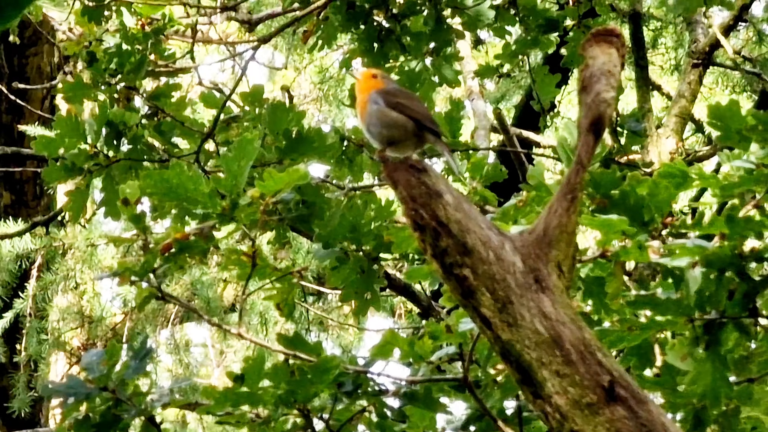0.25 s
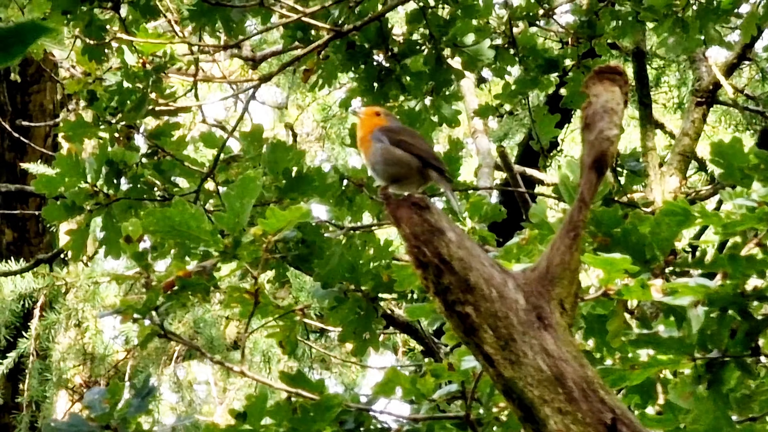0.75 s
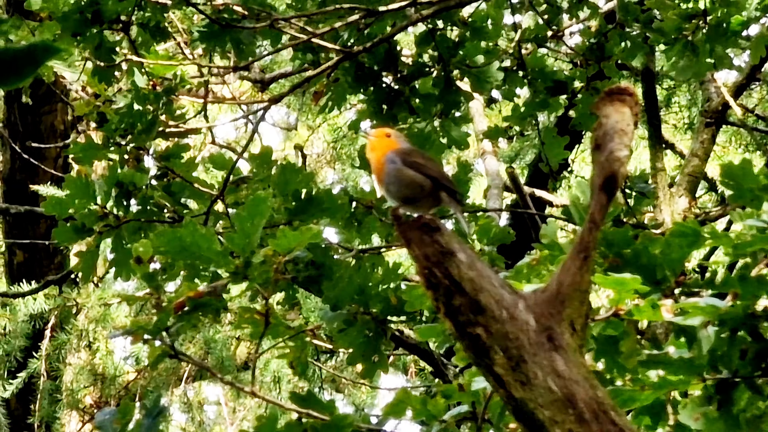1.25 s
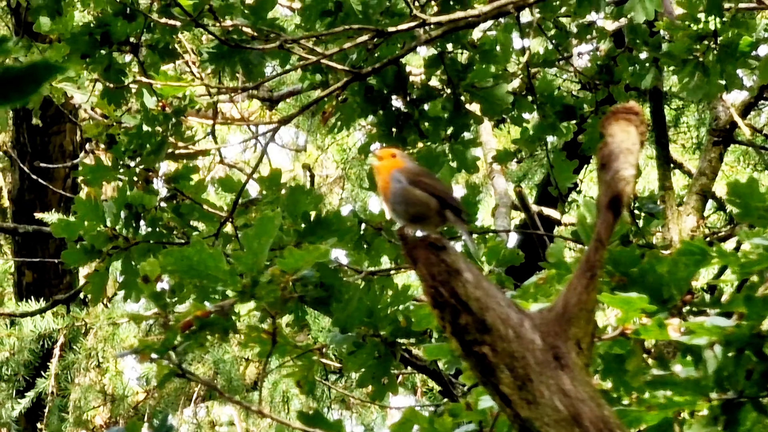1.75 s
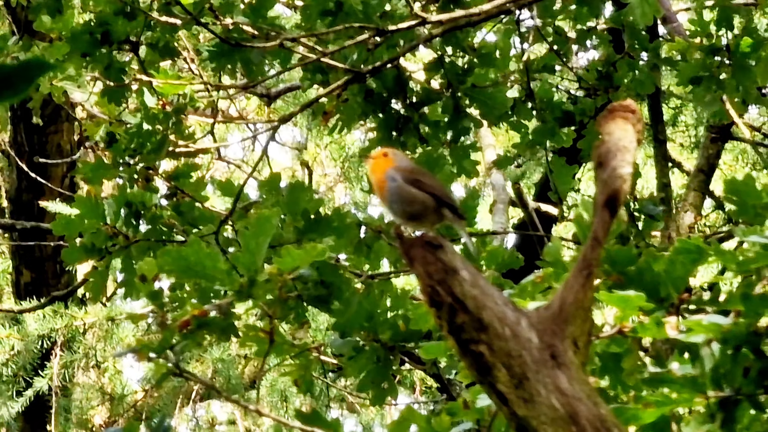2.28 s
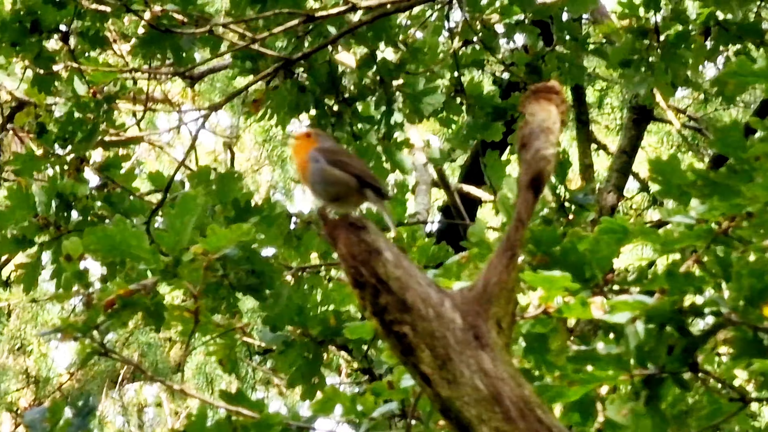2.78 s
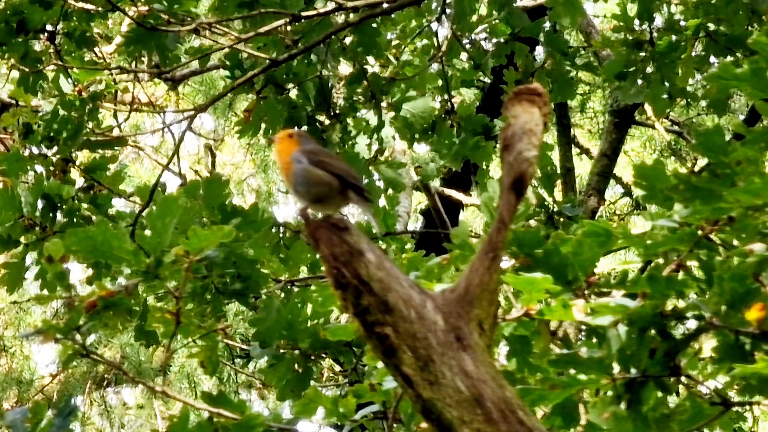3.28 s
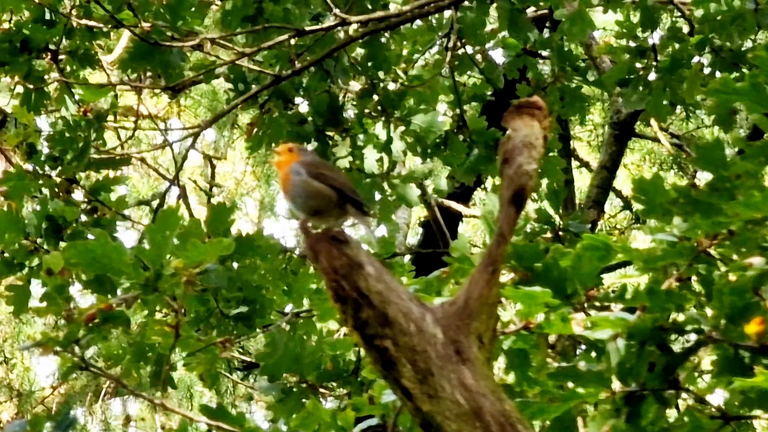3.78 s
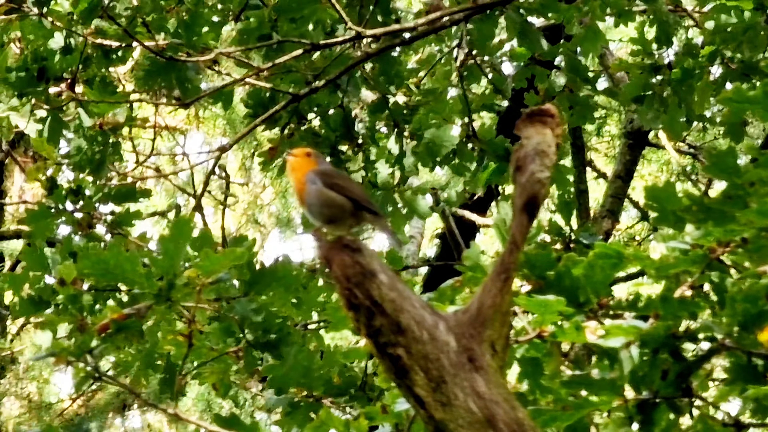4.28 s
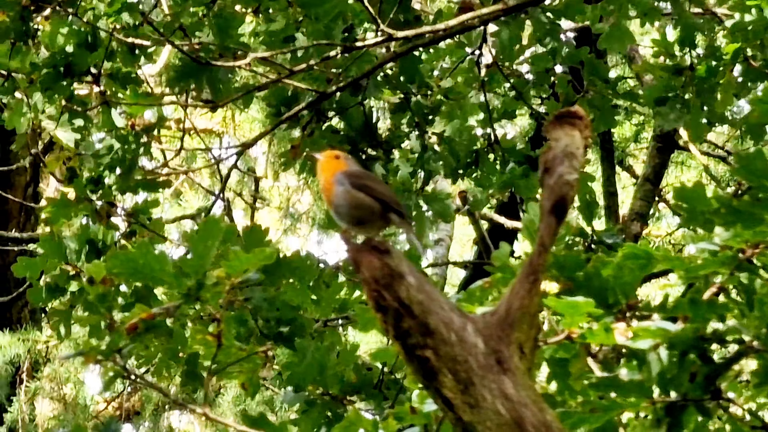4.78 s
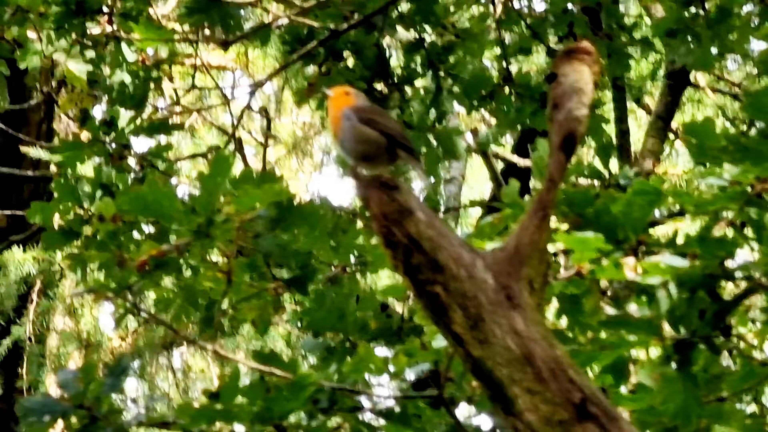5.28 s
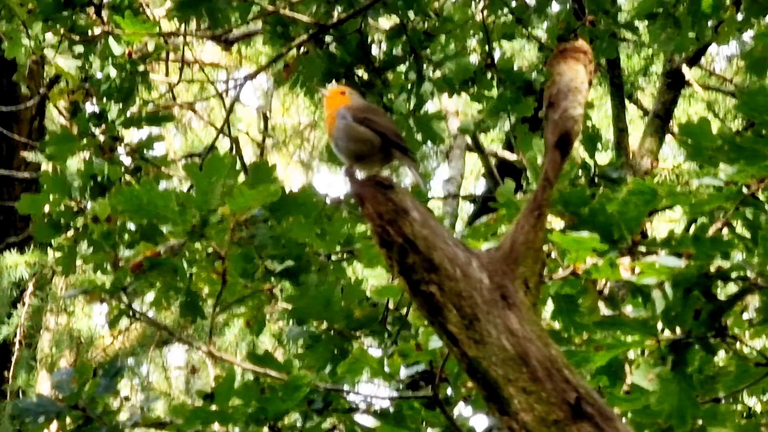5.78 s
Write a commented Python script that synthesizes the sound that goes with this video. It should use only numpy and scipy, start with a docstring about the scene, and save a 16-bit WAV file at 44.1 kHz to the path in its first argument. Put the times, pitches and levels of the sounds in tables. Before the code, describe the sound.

Outdoors in a leafy wood, a small robin sings quick phrases of clear, thin whistles, gliding, sinking low, then rising to a thin squeaky trill and a fast sparkling chatter. The song stops before five seconds. Sparse echoes scatter off trunks. Under it lie low distant traffic rumble, faint leaf hiss and very faint other birds. Small dry ticks come from the hand-held camera.

```python
"""A robin sings five quick warbling phrases from a branch in a leafy wood, mostly a little to the right.
Its syrinx is a gliding, near-pure whistle with weak overtones, swelled by breath and sometimes throbbing.
Trunks and leaves scatter each note into a tail of sparse echoes; faint blurred whistles are other birds.
The body of a hand-held camera ticks as ringing short modes; shaped noise makes far traffic rumble and leaf hiss.
"""
import sys
import numpy as np
from scipy import signal
from scipy.io import wavfile
from scipy.ndimage import uniform_filter1d

SR = 44100
rng = np.random.default_rng(int(sys.argv[2]) if len(sys.argv) > 2 else 0)


def voltage_ratio(level):
    """Linear amplitude factor for a level in decibels (scalar or array-like)."""
    return 10 ** (np.asarray(level, float) / 20)


def wrap_up_sound(samples):
    """Save the sound to the file named by the first command line argument, as 16-bit audio."""
    columns = np.atleast_2d(samples).T
    # keep every value between -1 and 1, then stretch to whole-number steps
    tamed = np.clip(columns, -1, 1)
    steps = np.round(tamed * 32767).astype(np.int16)
    wavfile.write(sys.argv[1], SR, steps)


N = 266364


def evened(x):
    """Scales to rms 1."""
    return x / np.sqrt(np.mean(x ** 2) + 1e-20)


def read(points, hz):
    """Reads a table on a log-frequency axis."""
    f, value = np.transpose(points)
    return np.interp(np.log(hz + 1), np.log(f + 1), value)


def add(mix, start_s, sound):
    """Mixes a sound in at its start time."""
    part = mix[..., round(start_s * SR):][..., :sound.shape[-1]]
    part += sound[..., :part.shape[-1]]


def wobble(count, size):
    """Smooth random drift of about rms 1; a larger size (samples) drifts more slowly."""
    noise = rng.standard_normal(count + size)
    smooth = uniform_filter1d(uniform_filter1d(noise, size), size)
    return evened(smooth)[:count]


def fade_inside(t, start, end, ramp_s):
    """Straight ramps up from start and down to end, 0 outside."""
    return np.clip(np.minimum(t - start, end - t) / ramp_s, 0, 1)


def chip(start, length, level_db, from_hz, to_hz):
    """One puff of breath: a single glide under one arch of level."""
    crest = 0.45  # share of the length at which the note is loudest
    arch_db, bend = -9, 1.1  # level at either end against the crest; power that bends the glide
    u = np.arange(0, length, 1 / SR) / length
    away = np.where(u < crest, 1 - u / crest, (u - crest) / (1 - crest))
    hz = from_hz + (to_hz - from_hz) * u ** bend
    return start + u * length, hz, level_db + arch_db * away ** 2


def unroll(path):
    """Draws a pitch path sample by sample, corners rounded as muscles move."""
    s, hz = np.transpose(path)
    t = np.arange(s[0], s[-1], 1 / SR)
    return t, uniform_filter1d(np.interp(t, s, hz), size=90)


# how readily the syrinx sounds at each pitch: (pitch [Hz], gain [dB])
SYRINX_YIELD = [(2100, -18), (2700, -14.5), (3300, -5.5), (4000, -2.5), (4800, 2), (5800, 0.5), (6800, 1.5),
                (7600, -7), (8600, -19)]


def whistle(path, effort_db, start_db, end_db):
    """Breath builds and ebbs; the syrinx sounds strongest in the middle of its range."""
    build, ebb = 3.0, 3.13  # powers that shape the start and the end
    t, hz = unroll(path)
    u = (t - t[0]) / (t[-1] - t[0])
    breath_db = effort_db + start_db * (1 - u) ** build + end_db * u ** ebb
    return t, hz, breath_db + read(SYRINX_YIELD, hz)


def snap(length, hz):
    """A click a few cycles long, spread wide and centred above the pitch."""
    t = (np.arange(length) - 60) / SR
    return np.exp(-(t * hz / 1.7) ** 2) * np.cos(2 * np.pi * 1.27 * hz * t)


# overtones of the whistle, before their colour: (multiple of the pitch [ratio], level [dB])
OVERTONES = [(2, -35.5), (3, -50), (4, -53.5), (5, -50)]
# colour that the overtones take on: (frequency [Hz], gain [dB])
OVERTONE_COLOUR = [(4000, -2.5), (5800, -8.5), (6600, 7.5), (8000, -20), (9500, -3), (10500, -7),
                   (11700, -5), (13000, -9), (15000, 8.5), (16000, 5.5)]
# level of the bird, left against right: (pitch [Hz], difference [dB])
BIRD_LEFT_LEVEL = [(2000, 3.5), (3500, -5.5), (5000, -5), (8000, -1)]
# phase by which the left leads the right: (pitch [Hz], lead [rad])
BIRD_LEFT_LEAD = [(2000, 2.27), (2760, 1.07), (4570, 0.09), (5600, 1.55), (7150, 1.93)]
# held notes that throb: (start [s], end [s], throb rate [Hz], depth [0-1], pitch swing [Hz])
PURRS = [(1.45, 1.6, 220, 0.85, 20), (3.6, 3.99, 300, 0.55, 110), (4.05, 4.1, 130, .2, 140),
         (4.676, 4.72, 95, 0.5, 110), (4.71, 4.8, 95, .4, 25)]
# soft low notes briefly gain an upper partial: (start [s], end [s], multiple of the pitch [ratio], level [dB])
LOW_PARTIALS = [(2.55, 2.685, 1.5, -3), (2.665, 2.785, 2, -8), (2.71, 2.75, 1.5, -3), (3.29, 3.36, 2, -10),
                (3.36, 3.425, 1.5, -1)]


def robin_note(t, hz, level_db):
    """A near-pure whistle with weak overtones; left and right differ in level and phase."""
    count = len(t)
    size = np.sqrt(2) * voltage_ratio(level_db + 1.2 * wobble(count, size=120))
    sung_hz = hz.copy()
    for start, end, throb_hz, depth, swing_hz in PURRS:
        # quicker throbs are more ragged
        turn = 2 * np.pi * throb_hz * t + throb_hz / 220 * wobble(count, size=300)
        inside = fade_inside(t, start, end, 0.011)
        sung_hz += swing_hz * np.cos(turn) * inside
        size *= 1 + depth * np.sin(turn) * inside
    cycles = np.cumsum(sung_hz * (1 + 0.0047 * wobble(count, size=60))) / SR
    angle = 2 * np.pi * (cycles + rng.random())
    angles = np.array([angle + read(BIRD_LEFT_LEAD, sung_hz), angle])
    tone = np.sin(angles)
    for k, db in OVERTONES:  # overtones are breathy: their phase wanders
        gain = voltage_ratio(db + read(OVERTONE_COLOUR, k * sung_hz)) * (k * sung_hz < 17000)
        tone += gain * np.sin((k - 1) * angle + angles + wobble(count, size=50))
    for start, end, k, db in LOW_PARTIALS:
        tone += voltage_ratio(db) * fade_inside(t, start, end, 0.012) * np.sin(k * angles)
    edge = fade_inside(t, t[0], t[-1], 0.003)
    tone *= np.sin(edge * np.pi / 2) ** 2
    if t[-1] - t[0] < 0.03:  # the syrinx snaps open and shut on quick notes
        tone += voltage_ratio(-18) * (snap(count, sung_hz[0]) + snap(count, sung_hz[-1])[::-1])
    return t[0], size * tone * voltage_ratio(np.outer([.5, -.5], read(BIRD_LEFT_LEVEL, sung_hz)))


# short notes, one glide each: (start [s], length [s], crest level [dB rms], from pitch [Hz], to pitch [Hz])
CHIPS = [ (0.714, 0.024, -55, 3460, 3600), (.74, 0.03, -42.5, 3840, 4030), (0.757, 0.0072, -38, 4000, 4140),
         (0.766, 0.011, -40.5, 3930, 4100), (0.776, 0.02, -35, 3710, 4320),
         (0.975, 0.017, -35.5, 3540, 5620), (1.175, 0.026, -28, 3770, 3740), (1.21, 0.013, -52, 3600, 3780),
         (1.251, 0.015, -32.5, 3870, 4070), (1.256, 0.0083, -33.5, 3830, 5260),
         (1.375, .023, -32, 3790, 3633), (1.426, 0.017, -41.5, 3600, 3550),
         (2.846, .014, -56.5, 4600, 4200), (2.86, 0.016, -45.5, 3940, 3740),
         (3.551, 0.029, -39.5, 6560, 7580), (3.64, 0.045, -31, 6920, 7230), (3.701, 0.049, -32, 7080, 7130),
         (3.748, .068, -28, 7080, 7240), (3.734, .065, -36, 7700, 7650), (3.801, 0.033, -32, 7820, 7250),
         (3.84, 0.033, -36.5, 7430, 7400), (3.927, 0.053, -42, 7600, 7780),
         (4.16, 0.017, -19.5, 3760, 3420), (4.194, .016, -24, 4680, 4150), (4.216, .016, -19.5, 4070, 4290),
         (4.23, 0.013, -28, 4900, 4500), (4.254, 0.0094, -21, 4570, 4780), (4.261, .011, -23, 4840, 4400),
         (4.277, 0.018, -21, 4174, 4990), (4.29, .014, -29, 4970, 3490), (4.313, 0.018, -23, 4365, 4280),
         (4.339, 0.019, -23.5, 3850, 4100), (4.358, 0.041, -32, 4080, 4370), (4.397, .012, -26, 3870, 5170),
         (4.413, 0.028, -37.5, 4610, 4000), (4.437, 0.015, -29.5, 4250, 3820),
         (4.457, 0.013, -25, 3690, 3760), (4.475, .012, -38.5, 3970, 3940), (4.542, .01, -21.5, 4150, 3550),
         (4.551, 0.012, -28.5, 3685, 4290), (4.583, 0.018, -24, 3775, 4060),
         (4.603, 0.011, -23, 3600, 2990), (4.614, .013, -25, 3440, 3240), (4.634, 0.023, -27, 3214, 2950),
         (4.652, 0.015, -25, 3200, 3860), (4.667, 0.015, -26.5, 3043, 3205), ]
# long whistles, one pitch path each: (time [s], pitch [Hz])
WHISTLES = [
    [(.875, 3750), (.884, 3780), (.888, 3270), (.893, 3460), (.899, 3070), (.912, 3350)],
    [(.99, 3920), (.996, 3770), (1.0, 4100), (1.005, 3433), (1.03, 3266), (1.045, 3390)],
    [(1.09, 3540), (1.11, 4204), (1.124, 3737), (1.163, 3723)],
    [(1.262, 3600), (1.28, 3590), (1.295, 3403), (1.315, 3440), (1.335, 3740)],
    [(1.46, 3585), (1.472, 3610), (1.59, 3631)],
    [(1.735, 6000), (1.743, 5140), (1.757, 5800), (1.764, 7540), (1.769, 6450), (1.775, 7900),
     (1.783, 5400), (1.793, 6800), (1.799, 5870), (1.82, 6200), (1.838, 4740), (1.85, 4690)],
    [(1.797, 7630), (1.825, 8680), (1.838, 6680), (1.854, 7250), (1.861, 6680), (1.88, 6850), (1.895, 5500),
     (1.91, 4710), (1.93, 4720), (1.941, 5000), (1.956, 2730), (1.971, 2710)],
    [(2.118, 8600), (2.13, 7700), (2.158, 7310), (2.188, 5550), (2.205, 6080), (2.23, 5576), (2.237, 5790),
     (2.246, 4630), (2.262, 4733), (2.284, 4784), (2.3, 2360)],
    [(2.392, 5700), (2.401, 4030), (2.411, 4167), (2.42, 3080), (2.443, 2780), (2.472, 2705)],
    [(2.5, 2322), (2.64, 2194), (2.79, 2124)],
    [(2.876, 3980), (2.922, 4464), (2.937, 5180), (2.954, 5440), (2.972, 5290), (2.982, 4650), (2.99, 3850),
     (3.004, 3060), (3.014, 2880), (3.025, 3040), (3.04, 2745), (3.082, 2580)],
    [(3.15, 2183), (3.187, 2060), (3.208, 2240)],
    [(3.24, 2220), (3.295, 2037), (3.357, 2046), (3.428, 2125)],
    [(3.58, 7300), (3.597, 6750), (3.638, 6830)],
    [(3.59, 7350), (3.62, 7450), (3.632, 7760), (3.66, 7730)],
    [(4.061, 3760), (4.068, 3710), (4.1, 3906), (4.14, 3500)],
    [(4.682, 2940), (4.7, 3124), (4.75, 2938), (4.76, 2860), (4.79, 2887)],
]
# breath behind each whistle, before the syrinx's yield:
# (effort [dB rms], change at the start [dB], change at the end [dB])
BREATHS = [(-31, -5.5, -9), (-22.5, -8.5, -6.5), (-28.5, 2, -5.5), (-26, 7.5, -7), (-40, -2, -2),
           (-36, -21.5, -4), (-16.5, -18.5, -9.5), (-17, -9, -7), (-24, -2, -7.5), (-31.5, -11.5, -5),
           (-21, -3.5, 4), (-23.5, -2.5, -7), (-26.5, -3, -12.5), (-28, -14.5, 0), (-28, -8, -3),
           (-18.5, -8.5, -3), (-20.5, 1.5, -6.5)]


def robin():
    """The song without its echoes: short chips and long whistles from one syrinx."""
    song = np.zeros((2, N))
    for row in CHIPS:
        add(song, *robin_note(*chip(*row)))
    for path, breath in zip(WHISTLES, BREATHS):
        add(song, *robin_note(*whistle(path, *breath)))
    return song


# how long the late tail rings: (frequency [Hz], t60 [s])
WOOD_DECAY = [(2000, 0.61), (4000, 0.76), (6000, 0.56), (8500, 0.85), (15000, 0.043)]
# single echoes off the perch and the nearest boughs: (delay [s], level [dB])
BOUGHS = [(.0018, -16), (.0043, -16), (.0052, -20), (.0076, -21), (.0085, -19), (.0135, -23), (.021, -24),
          (.030, -23)]


def echoes(shared):
    """Sparse echoes off trunks and leaves: boughs, near scatter, and a tail dying band by band."""
    taps = np.zeros((3, SR))
    # one echo of random sign in every 20 samples
    at = np.arange(80, SR - 20, 20) + rng.integers(0, 20, (3, (SR - 81) // 20))
    np.put_along_axis(taps, at, rng.choice([-1., 1.], at.shape), 1)
    taps = shared * taps[2] + np.sqrt(1 - shared ** 2) * taps[:2]  # part common to left and right
    hz, frame_s, z = signal.stft(taps, SR, nperseg=256)
    z = z * voltage_ratio(-60 * frame_s / read(WOOD_DECAY, hz)[:, None])
    late = signal.istft(z, SR, nperseg=256)[1][:, :SR]
    near = taps * voltage_ratio(-60 * np.arange(SR) / SR / 0.12)  # the leaves around the perch
    tail = sum(voltage_ratio(db) * part / np.linalg.norm(part[0]) for part, db in [(near, -13), (late, -14.5)])
    for delay, db in BOUGHS:
        tail[[0, 1], round(delay * SR) + rng.integers(0, 6, 2)] += voltage_ratio(db)
    return tail


def wood(x, shared=0.49):
    """Leaves stir and the bird turns its head, so the sound passes from one set of echoes to the next."""
    turn = np.pi * 9.5 * np.arange(N) / SR
    wet = np.zeros((2, N))
    for k in range(3):
        window = np.sqrt(2 / 3) * np.cos(turn + k * np.pi / 3)
        wet += signal.fftconvolve(x * window, echoes(shared), axes=1)[:, :N]
    return wet


def far_call(start, length, level_db, from_hz, to_hz):
    """A distant bird: a whistle blurred by its long path through leaves."""
    hz = np.linspace(from_hz, to_hz, round(length * SR))
    blur = 1.1 + wobble(len(hz), size=95) + 1j * wobble(len(hz), size=95)
    tone = (blur * np.exp(2j * np.pi * np.cumsum(hz) / SR)).real
    return start, voltage_ratio(level_db) * tone * signal.windows.tukey(len(hz), .6)


# distant calls: (start [s], length [s], relative level [dB], from pitch [Hz], to pitch [Hz])
FAR_CALLS = [(0.098, .14, -67, 3580, 3600), (0.359, .3, -63, 2130, 2220), (0.298, 0.32, -63.5, 3290, 3020),
             (0.63, 0.18, -66, 7520, 7300), (2.446, 0.45, -60.5, 6830, 7180),
             (2.689, 0.077, -59.5, 7700, 7230), (3.547, 0.034, -63.5, 3560, 3600),
             (3.568, 0.054, -67, 3980, 4330), (3.733, 0.045, -63.5, 4000, 4300),
             (5.183, .05, -58, 4090, 4100), (5.364, 0.0732, -52.5, 4600, 4120),
             (5.43, .12, -62, 4340, 4240), (5.554, 0.15, -64, 3820, 3910), (5.82, 0.22, -70, 8000, 8100)]


def far_birds():
    """Faint calls that reach the ear mostly as echo."""
    calls = np.zeros((2, N))
    for row in FAR_CALLS:
        add(calls, *far_call(*row))
    return voltage_ratio(-4) * calls + voltage_ratio(3) * wood(calls, shared=0.4)


# ticks of the camera body:
# (time [s], peak level midway between the sides [dB], left against right [dB], brightness [0.5 = plain])
TICKS = [(.010, -37.5, 14, 1), (0.1668, -37, 14, 1.0), (0.2642, -18, 21, 0.28), (0.275, -30, -2, 0.066),
         (.5035, -36.5, 0, 0.77), (1.5345, -45, -3, 0.9), (1.549, -39, 1, .8), (4.3745, -32.5, 10, 0.68),
         (5.2106, -35, 0.5, 0.44), (5.5036, -38, -2, .6)]
# ringing modes of the case, level before the brightness tilt: (frequency [Hz], level [dB], t60 [s])
CASE_MODES = [(158, -10.5, 0.014), (734, -2.5, 0.0033), (1800, -3, 0.0011), (3600, 6.5, 0.0018),
              (6700, -6.5, 0.0023), (13200, -18, .0015)]


def ticks():
    """Each tick rings the short modes of the case; bright ones favour the high modes."""
    t, out = np.arange(900) / SR, np.zeros((2, N))
    for s, peak_db, pan_db, bright in TICKS:
        tilt_db = 14 * (bright - .5)  # per octave
        ring = np.zeros(len(t))
        for hz, db, t60 in CASE_MODES:
            decay = voltage_ratio(db + tilt_db * np.log2(hz / 2000) - 60 * t / t60)
            ring += decay * np.sin(2 * np.pi * hz * t + np.pi / 4)
        ring *= 1 - np.exp(-t / .00004)  # the blow takes a moment to land
        sides_db = peak_db + np.array([[.5], [-.5]]) * pan_db
        add(out, s, voltage_ratio(sides_db) * ring / abs(ring).max())
    return out


# traffic rumble and leaf hiss: (frequency [Hz], relative density [dB per Hz])
AIR_COLOUR = [(12, -37), (20, -26.5), (87, 1), (145, -10), (191, -9), (420, -17.5), (615, -21), (1740, -32),
              (3540, -38), (4340, -36), (5180, -37.5), (8600, -42.5), (11200, -83.5), (18900, -120)]
# faint treble hiss, before its offset below the rumble: (frequency [Hz], relative density [dB per Hz])
AIR_TREBLE = [(7000, -21), (9000, 3.5), (11000, 2.5), (15700, -4)]
# left-right likeness of the air: (frequency [Hz], correlation [-1 to 1])
AIR_LIKENESS = [(60, .89), (150, .87), (300, .83), (640, .45), (1400, -.25), (3100, 0), (15000, .05)]
# level of the air, left against right: (frequency [Hz], difference [dB])
AIR_LEFT = [(60, -0.5), (180, 0.5), (550, -1), (1650, 3.5), (4970, -4.5), (15000, 9.5)]
# slow random drift in level of the deepest rumble: (time [s], relative level [dB])
RUMBLE_DRIFT = [(0.1, -42.5), (1.44, -42), (1.97, -49), (2.73, -41), (5.87, -44.5), (5.9, -43)]


def air():
    """Random short-time spectra: rumble that drifts unevenly in level, hiss in faint patches."""
    level_db, treble_db = -40, -57  # rms of the whole air; offset of the treble hiss
    frames, hz = N // 256 + 5, np.fft.rfftfreq(1024, 1 / SR)
    a, b, c, d, patches = rng.standard_normal((frames, 513, 5)).T
    patches = uniform_filter1d(uniform_filter1d(patches, size=12, axis=0), size=14, axis=1)
    patches_db = 1.9 * evened(patches)
    s, drift_db = np.transpose(RUMBLE_DRIFT)
    drift_db = np.interp((np.arange(frames) - 2) * 256 / SR, s, drift_db - drift_db.mean())
    deep = 1 / (1 + (hz / 140) ** 4)  # only the lowest band drifts
    same, left = read(AIR_LIKENESS, hz)[:, None], a + 1j * b
    right = same * left + np.sqrt(1 - same ** 2) * (c + 1j * d)
    colour = np.hypot(voltage_ratio(read(AIR_COLOUR, hz)), voltage_ratio(treble_db + read(AIR_TREBLE, hz)))
    z = np.array([left, right]) * colour[:, None] * voltage_ratio(patches_db + deep[:, None] * drift_db)
    z *= voltage_ratio(np.outer([.5, -.5], read(AIR_LEFT, hz)))[:, :, None]
    noise = signal.istft(z, nperseg=1024, noverlap=768)[1][:, :N]
    return voltage_ratio(level_db) * evened(noise)


def scene():
    """The robin and far birds in the wood, over the ticks and the air."""
    song = robin()
    return song + wood(song) + far_birds() + ticks() + air()


def top_cut(x):
    """Nothing passes above the cut-off."""
    return signal.sosfilt(signal.butter(12, 16600, fs=SR, output="sos"), x)


# treble dip and band limit of the microphone: (frequency [Hz], gain [dB])
MICROPHONE = [(8300, 0), (9000, -8), (10000, -16), (11200, -2), (12000, 0), (15600, 0), (16000, -70)]


def record(dry):
    """The microphone filters the sound with a treble dip and a band limit."""
    hz = np.linspace(0, SR / 2, 257)
    colour = signal.firwin2(255, hz, voltage_ratio(read(MICROPHONE, hz)), fs=SR)
    mix = signal.oaconvolve(dry, colour[None], "same")
    return top_cut(mix)


dry = scene()
out = record(dry)
wrap_up_sound(out)
```